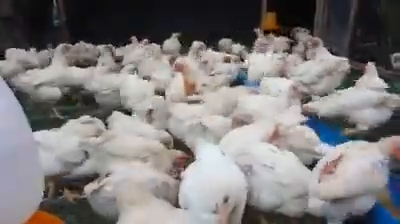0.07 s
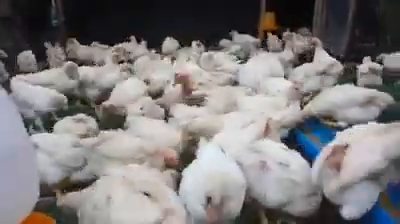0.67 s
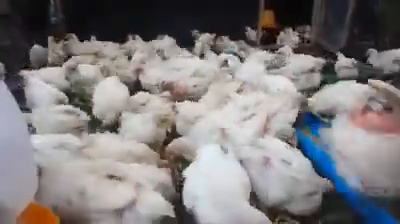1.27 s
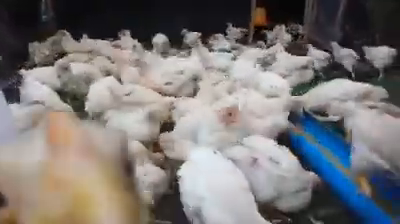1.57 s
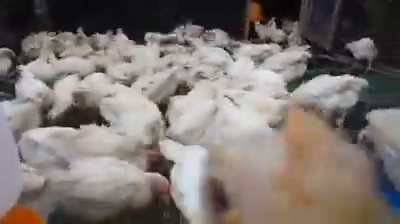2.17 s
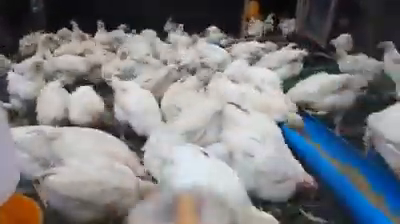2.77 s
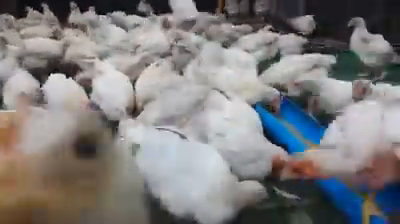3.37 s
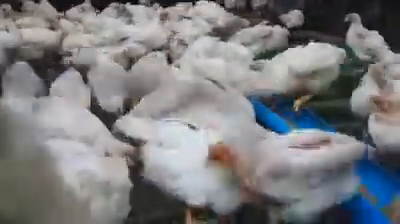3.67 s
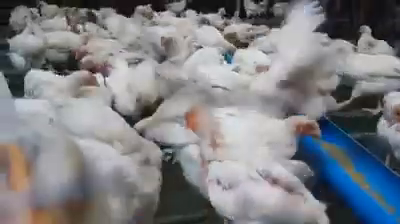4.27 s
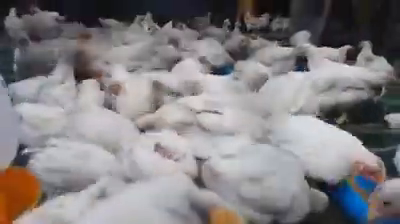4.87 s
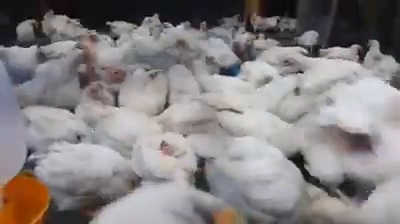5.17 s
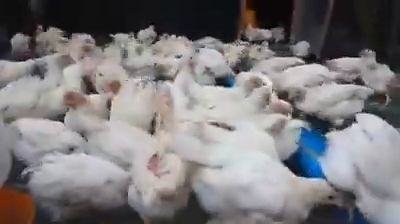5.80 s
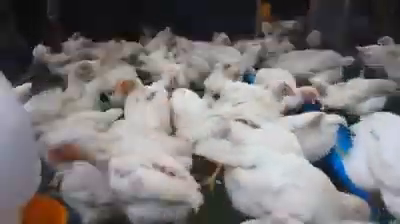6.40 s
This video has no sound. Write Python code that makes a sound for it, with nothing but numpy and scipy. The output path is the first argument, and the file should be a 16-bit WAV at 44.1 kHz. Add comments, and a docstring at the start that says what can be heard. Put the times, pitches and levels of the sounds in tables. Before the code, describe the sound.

A dense flock of young chickens peeps throughout in a slightly reverberant barn. Near birds give short, high, clear calls that fall in pitch, several a second and somewhat to the left, over a blurred chorus of farther birds. Underneath are a steady low fan rumble, a very faint cricket trill and soft shuffling in litter. Beaks tick lightly during the first second. Around 1.7 seconds a jostled bird gives a few brief harsh squeaks. At about 2.6 seconds one bird pecks the microphone, a loud, sharp, overloaded knock on the left. Everything then turns much quieter for about a second, climbing back by 4 seconds. From 3.5 to 5.5 seconds, feet and beaks knock lightly on floor and trough among the peeps. A few more ticks follow, and feathers brush past close by near 6.4 seconds as the peeping carries on.

```python
"""In a barn, a dense flock of young chickens peeps over a rumbling fan and a faintly trilling cricket.
Each peep is a nearly pure tone of the syrinx that sags and dives as the air runs out; roof and walls
add reverberation. Beaks and feet excite damped modes; litter and feathers make friction noise.
One bird pecks a small camera standing among them: the blow overloads its microphone,
and its gain control turns everything down for about a second."""
import sys
import numpy as np
from scipy import signal
from scipy.fft import rfft, irfft, next_fast_len
from scipy.io import wavfile
from scipy.ndimage import uniform_filter1d, map_coordinates

SR = 44100
rng = np.random.default_rng(int(sys.argv[2]) if len(sys.argv) > 2 else 0)


def digitize_waveform(pressure):
    """Quantize a signal to 16-bit integers and store it at the path in sys.argv[1].

    Rows of a 2-D input are taken as channels; values are limited to [-1, 1].
    """
    field = np.atleast_2d(pressure).T
    bounded = np.clip(field, -1, 1)
    quanta = np.round(bounded * 32767).astype(np.int16)
    wavfile.write(sys.argv[1], SR, quanta)


N = 292824

# Levels in the tables are relative: each source applies its own gains.
# Peeps of near birds: t/s, duration/s, f/Hz, sag/(Hz/s), final dive/Hz, level/dB, left minus right/dB
NEAR_PEEPS = [(0.129, 0.13, 5160.0, 10170, 250.0, -34.5, 8), (0.413, 0.15, 5260, 5880, 250, -36.5, 11),
              (0.428, 0.057, 4520, 5000.0, 250.0, -32.0, 4.0), (0.501, 0.19, 4384, 4570, 590, -27, 10),
              (0.52, 0.06, 3340, 6400.0, 250.0, -40.5, 1.0), (0.628, 0.081, 5120, 2950, 598, -33, 15),
              (0.678, 0.14, 4540, 2570, 1930, -34, 7.0), (1.123, 0.16, 5030, 3494, 630.0, -38.5, 15),
              (1.134, 0.05, 4620, 39600, 250.0, -35, -1.0), (1.31, 0.15, 5400, 14000.0, 250.0, -39.0, 5),
              (1.4, 0.06, 3080, 5670, 350.0, -38, 2.0), (1.484, 0.084, 3370.0, 12840, 250.0, -39.0, -1),
              (1.53, 0.15, 5470, 8260, 403, -35.5, 13), (1.666, 0.11, 4620, 3970, 250.0, -21.5, 8),
              (1.915, 0.086, 4540.0, 13640, 250.0, -35, -3), (2.027, 0.049, 4960, 37400, 250.0, -32.5, 8.0),
              (2.096, 0.11, 4580, 10400, 250.0, -34, 5.0), (2.277, 0.13, 5030, 12070, 250.0, -38, 9),
              (2.374, 0.19, 4580.0, 1543, 250.0, -34, 6), (2.387, 0.046, 3770, 20800, 200, -28, 5),
              (2.519, 0.035, 5360, 12000.0, 2690, -24.0, 2.0), (2.563, 0.073, 4100, 1200.0, 880, -36.5, -6),
              (2.727, 0.14, 5110, 7820, 1236, -30, 5), (2.738, 0.21, 4500, 4370, 250.0, -30, 4),
              (2.893, 0.14, 4560, 4100.0, 1148, -31, 5), (3.115, 0.077, 4490, 12460, 1037, -27.5, 6.5),
              (3.135, 0.1, 5620, 17500, 1520, -27, 3), (3.184, 0.12, 4180, 2120, 1570.0, -30.5, 2),
              (3.302, 0.11, 4320, 4850, 1056, -33.5, 5), (3.395, 0.0202, 2950, 16000, 350, -19.5, 10),
              (3.438, 0.15, 4550, 4850, 250.0, -31.5, 12), (3.574, 0.1, 4650, 7040, 280.0, -34.5, -1.0),
              (3.753, 0.113, 5500, 21800, 590, -31.5, 1.0), (3.895, 0.093, 4604, 3830, 250.0, -28, -2.0),
              (3.977, 0.12, 5655, 17340, 1383, -28, -1), (4.088, 0.05, 4865, 2000.0, 250.0, -34.5, 19),
              (4.229, 0.16, 4273, 2870, 249, -33.5, 4), (4.401, 0.029, 3180, 23400, 255, -27, 3.0),
              (4.406, 0.044, 4900, 12300, 250.0, -33, 5.0), (4.501, 0.06, 5330.0, 2400.0, 653, -34, 12),
              (4.53, 0.047, 3430, 10500, 250.0, -38, -7), (4.55, 0.12, 4510, 13140, 380.0, -32, -6),
              (4.701, 0.03, 3350, 20400, 870, -32, 2.0), (4.694, 0.045, 5670.0, 20500.0, 250.0, -35, 9.0),
              (4.74, 0.091, 4670.0, 3730, 800, -31, 8), (4.861, 0.1, 5140, 1300.0, 278, -38, 14),
              (4.936, 0.044, 5150, 35800.0, 250.0, -28.5, -2.0),
              (4.983, 0.09, 4630.0, 1700.0, 1477, -26.5, -5),
              (4.991, 0.07, 5260.0, 1200.0, 1560.0, -30.5, 3),
              (5.069, 0.049, 3460, 21100, 250.0, -34.5, -7), (5.231, 0.12, 5220.0, 19600, 836, -38, 3),
              (5.345, 0.18, 4850, 8500, 250, -28, 1.5), (5.351, 0.07, 4500, 3600, 151, -29.5, -4),
              (5.52, 0.088, 4680.0, 2000.0, 250.0, -35.5, 15), (5.661, 0.14, 4610, 4230, 200, -39.5, 4),
              (5.9, 0.16, 4754, 6300.0, 677, -24.5, -3.0), (6.091, 0.087, 4550.0, 1800.0, 250.0, -36, 7.0),
              (6.176, 0.064, 3250, 8850, 250.0, -36.5, -1.0), (6.267, 0.17, 4327, 4070, 690.0, -32.5, 1),
              (6.505, 0.054, 4170, 12400, 200, -37.5, -4), (6.615, 0.034, 3660, 23600, 250.0, -33, -5)]
# Calls that dip and swing up: t/s, duration/s, lowest f/Hz, rise/Hz, level/dB, left minus right/dB
NEAR_TWITTERS = [(2.407, .02, 2748, 800, -28, 0), (2.657, 0.041, 3310, 450, -40, 2),
                 (2.948, 0.03, 3420, 402, -32.5, 12.5), (4.954, 0.04, 2980, 1000, -26, -1),
                 (5.147, 0.058, 3370, 2220, -27.5, 5)]
# Harsh squeaks of a jostled bird: t/s, duration/s, f/Hz, level/dB, roughness (0-1)
JOSTLED_SQUEAKS = [(1.667, 0.012, 2830, -27.5, 0.35), (1.68, 0.029, 2426, -28.5, 0.67),
                   (1.685, 0.035, 3150, -28.5, 0.12), (1.783, 0.0098, 2434, -19.5, 0.36),
                   (1.796, 0.053, 2410, -29.5, 0.22), (1.788, 0.029, 3010, -25.5, 0.32),
                   (1.976, 0.049, 2360, -42, 0.26), (2.54, 0.014, 2074, -29, 0.55),
                   (2.557, 0.015, 2635, -22, 0.96), (5.932, .11, 2360, -52, 0.17)]
# Envelope of the farther birds together: t/s, level/dB
FLOCK_ENVELOPE = [(0, -41), (0.1, -44), (0.18, -36), (0.6, -37), (0.95, -41), (1.75, -31), (1.95, -37.5),
                  (2.25, -38), (2.45, -32), (2.85, -41), (3.3, -33.5), (3.7, -38.5), (4, -34),
                  (5.05, -34.5), (5.25, -41), (5.8, -36), (6.1, -40.5), (6.64, -41.5)]
# Spectrum of the farthest, blurred voices: f/Hz, level/dB
CHORUS_SPECTRUM = [(1200, -43.5), (1900, -11), (2400, -0.5), (3100, -6.5), (4400, 3), (5100, 3),
                   (5700, 0.5), (7500, -12), (10000, -27.5)]
# Beaks ticking on hard things: t/s, level/dB
BEAK_TICKS = [(0.1227, -21.5), (0.5027, -25), (0.695, -28), (0.9133, -25.5), (0.982, -33), (1.054, -23.5),
              (2.086, -30.5), (4.1774, -27.5), (4.962, -22), (5.6654, -32), (6.055, -32), (6.121, -34)]
# Feet and beaks knocking on floor and trough: t/s, level/dB, ring f/Hz
FLOOR_KNOCKS = [(2.216, -35.5, 653), (2.39, -37.5, 1015), (3.461, -30, 515), (3.564, -28, 1229),
                (3.757, -35.5, 1280), (3.775, -35, 990), (3.835, -35.5, 764), (4.055, -38, 596),
                (4.181, -36, 1800), (4.229, -33, 804), (4.435, -32.5, 615), (4.462, -33.5, 1304),
                (4.965, -35, 978), (5.336, -35, 1850), (6.425, -31, 299)]
# Noise spectrum of a hard contact: f/Hz, level/dB
CONTACT_SPECTRUM = [(1000, -11), (5000, 3.5), (8000, 2), (11000, -2.5), (15000, -17.5)]
# Envelope of feet shuffling in the litter: t/s, level/dB
SHUFFLE_ENVELOPE = [(0, -41.5), (.4, -44.5), (1.1, -46), (2.5, -44), (3.9, -44.5), (4.4, -39.5),
                    (4.75, -44.5), (5.1, -45), (5.5, -41.5), (6.42, -41.5), (6.64, -49)]
# Spectrum of the trodden litter: f/Hz, level/dB
LITTER_SPECTRUM = [(150, -37), (400, -2.5), (750, -1.5), (1100, -5.5), (1600, -5.5), (2500, -6), (5000, -7),
                   (15000, -31)]
# Spectrum of rubbing feathers: f/Hz, level/dB
RUB_SPECTRUM = [(800, -11), (3000, -10.5), (6000, 4.5), (8000, 4), (10500, 0), (13000, -7), (15500, -27)]
# Feathers brushing past: centre t/s, half duration/s, level/dB
FEATHER_BRUSHES = [(0.508, 0.041, -40.5), (2.314, 0.023, -48), (2.424, .025, -44.5), (3.166, 0.05, -34),
                   (3.533, 0.026, -32.5), (4.023, 0.043, -41), (5.46, 0.055, -41), (5.744, 0.15, -43),
                   (6.427, 0.063, -31)]
# Spectrum of feathers close by: f/Hz, level/dB
BRUSH_SPECTRUM = [(800, -6), (3000, -3), (6000, -5), (8000, 2), (11000, 1), (13500, -6.5), (15500, -19)]
# Envelope of the ventilation: t/s, level/dB
FAN_ENVELOPE = [(0, -43.5), (1, -45.5), (3.6, -45.5), (4.3, -44), (6.1, -44), (6.64, -41)]
# Spectrum of its rumble: f/Hz, level/dB
FAN_SPECTRUM = [(15, -16), (30, -13.5), (50, -5), (95, 0.5), (170, -0.5), (260, -6.5), (500, -12.5),
                (1000, -16.5), (3000, -62)]
# Reverberation time of the barn: f/Hz, T60/s
BARN_T60 = [(200, 0.44), (2500, 0.24), (4500, 0.21), (10000, 0.11)]
# Likeness of the noise at left and right: f/Hz, correlation (0-1)
STEREO_CORRELATION = [(200, 0.95), (500, 0.86), (1000, 0.29), (2500, 0.19), (10000, 0.19)]
# Response of the duller, left microphone: f/Hz, level/dB
LEFT_MIC_RESPONSE = [(5000, 0), (7000, 3.5), (9000, -7.5), (12500, -15.5)]


def peep(length, hz, sag, dive, scoop=0.0453, build_s=0.01522, dive_s=.025, soft_db=2.5, fade_db=2):
    """Air pressure drives the syrinx: the tone rises as it builds, sags, then dives as the air runs out."""
    t = np.arange(int(length * SR)) / SR
    building, spent = np.exp(-t / build_s), np.exp((t - length) / dive_s)
    pitch = hz * (1 - scoop * building) - sag * t - dive * spent
    return whistle(pitch) * amp(1.2 * wobble(21.6, len(t)) - soft_db * building - fade_db * spent)


def twitter(length, low_hz, rise, turn=0.47):
    """Frequency modulation along a parabola: the pitch swings down and up again."""
    progress = np.linspace(0, 1, int(length * SR))
    return whistle(low_hz + rise * ((progress - turn) / (1 - turn)) ** 2)


def whistle(hz, waver=0.00707, rasp=0.012, flutter_db=2.0, octave_db=-27, attack=0.0053, release=0.0038):
    """Self-sustained oscillation of the syrinx: a nearly pure tone with a slight waver and rasp."""
    n = len(hz)
    t = np.arange(n) / SR
    pitch = hz * (1 + waver * wobble(111.3, n) + rasp * wobble(898.6, n))
    phase = 2 * np.pi * np.cumsum(pitch) / SR
    tone = np.sin(phase) + amp(octave_db) * np.sin(2 * phase)
    gate = np.clip(t / attack, 0, 1) * np.clip(t[::-1] / release, 0, 1)
    return np.sqrt(2) * gate * amp(flutter_db * wobble(150, n)) * tone


def squeak(length, hz, roughness):
    """Irregular oscillation: a forced syrinx jumps about in frequency and amplitude."""
    n = int(length * SR)
    phase = 2 * np.pi * np.cumsum(hz * (1 + 0.17 * roughness * wobble(886, n))) / SR
    strength = amp(11.05 * roughness * wobble(200, n))
    return unit(np.sin(phase) * strength * signal.windows.tukey(n, .5))


def near_birds(even_db=-38.5, wet_slope=.5, squeak_wet_db=-4):
    """Direct and reverberant sound: a fainter bird is farther off, so more arrives by way of the walls."""
    direct, to_walls = np.zeros((2, 2, N))
    for call, rows in (peep, NEAR_PEEPS), (twitter, NEAR_TWITTERS):
        for start, *shape, db, left_db in rows:
            wet = amp(np.clip(wet_slope * (even_db - db), -10, 2))
            voice = amp(db) * call(*shape) / np.hypot(1, wet)
            add(direct, start, panned(left_db) * voice)
            add(to_walls, start, wet * panned(left_db / 2) * voice)
    for start, length, hz, db, roughness in JOSTLED_SQUEAKS:
        cry = amp(db) * panned(1.9) * squeak(length, hz, roughness)
        add(direct, start, cry)
        add(to_walls, start, amp(squeak_wet_db) * cry)
    return direct + barn(to_walls)


def far_birds(count=190, voices_db=-2, blur_db=-3.0, direct_db=-4, sag_share=.65):
    """Incoherent superposition: many distant peeps overlap, and the farthest blur into noise."""
    direct = np.zeros((2, N))
    for when, span, high, fall, loud, side in rng.random((count, 6)):
        length, hz = .04 + .12 * span, 3400 + 2000 * high
        drop_hz = hz * (.15 + .27 * fall)
        voice = peep(length, hz, sag=sag_share * drop_hz / length, dive=(1 - sag_share) * drop_hz)
        add(direct, when * N / SR, amp(7.8 * loud) * panned(12 * (side - .5)) * voice)
    voices = amp(voices_db) * unit(amp(direct_db) * direct + barn(direct))
    blur = amp(blur_db) * rush(CHORUS_SPECTRUM, patchy_db=4)
    return amp(curve(FLOCK_ENVELOPE)) * panned(2.2) * (voices + blur)


def camera_peck(start=2.5561, port_hz=1030, port_s=0.00236, case_hz=370, mount_hz=85):
    """Impact beside the left microphone: a crack, and resonances of the port's air, case and mount."""
    out, t = np.zeros((2, N)), np.arange(SR // 10) / SR
    port = np.sin(2 * np.pi * port_hz * t) * (t < port_s) * abs(np.sin(np.pi * t / port_s)) ** 0.35
    crack = contact_noise(len(t)) * np.exp(-t / .0024)
    case = np.sin(2 * np.pi * case_hz * t) * np.exp(-t / 0.002)
    mount = .09 * np.sin(2 * np.pi * mount_hz * t) * np.exp(-t / 0.0083)
    add(out, start, panned(26) * port + amp(-6) * crack + amp(-11.5) * panned(3.5) * (case + mount))
    return out


def pecking(tick_hz=4546, tick_db=7.0, knock_db=8, scratch_db=-37, scratches=45, wet_db=-8):
    """Impulsive excitation by beaks and feet: bright ticks, duller knocks and faint claw scratches."""
    out = np.zeros((2, N))
    for start, db in BEAK_TICKS:
        add(out, start, amp(db + tick_db) * contact(tick_hz, t60=0.023, crack=0.79, rise_s=0.001))
    for start, db, hz in FLOOR_KNOCKS:
        add(out, start, amp(db + knock_db) * contact(hz, t60=0.07, crack=0.38, rise_s=0.00021))
    for when, size, high in rng.random((scratches, 3)):
        scratch = contact(4500 + 2500 * high, t60=.016, crack=2.5, rise_s=0.00048)
        add(out, when * N / SR, amp(scratch_db + 8 * size) * scratch)
    return out + amp(wet_db) * barn(out)


def contact(hz, t60, crack, rise_s):
    """Damped free vibration after a blow: five modes near hz decay with a burst of noise; peak 1."""
    t = np.arange(SR // 8) / SR
    mode_hz = hz * np.exp(.22 * rng.standard_normal((5, 1)))
    ring = unit(np.sin(2 * np.pi * mode_hz * t).sum(0)) * panned(2.3)
    noise = crack * panned(-4) * contact_noise(len(t))
    blow = (ring + noise) * (1 - np.exp(-t / rise_s)) * np.exp(-np.log(1000) * t / t60)
    return blow / abs(blow).max()


def contact_noise(size):
    """A brief, hard contact has a broad spectrum: stereo noise of rms 1."""
    colour = amp(along(CONTACT_SPECTRUM, np.fft.rfftfreq(size, 1 / SR)))
    return unit(irfft(rfft(rng.standard_normal((2, size))) * colour, size))


def rustling(feather_db=-48, grain_db=3):
    """Friction noise: feet shuffle in the litter; feathers rub and brush past, mostly on the right."""
    t = np.arange(N) / SR
    shuffling = amp(curve(SHUFFLE_ENVELOPE) + 2.37 * wobble(35, N))
    feet = shuffling * panned(3.3) * rush(LITTER_SPECTRUM, patchy_db=3.0)
    rub = amp(feather_db + 2.4 * wobble(14, N)) * rush(RUB_SPECTRUM, patchy_db=3.0)
    passes = sum(amp(db) * np.exp(-((t - centre) / half) ** 2) for centre, half, db in FEATHER_BRUSHES)
    brush = passes * rush(BRUSH_SPECTRUM, patchy_db=3.5)
    catching = unit(amp(grain_db * wobble(600, N)))  # barbs catch and slip
    return feet + panned(-5) * catching * (rub + brush)


def fan():
    """Broadband ventilation noise, its energy mostly at low frequencies: a nearly steady rumble."""
    return amp(curve(FAN_ENVELOPE)) * panned(0.78) * rush(FAN_SPECTRUM, patchy_db=.5)


def cricket(chirps_per_s=11.4, hz=6530, sweep=0.0735, scatter=0.015, stroke_s=0.01, spacing_s=.015):
    """Stridulation: each chirp is three wing strokes, each falling in pitch and no two alike."""
    out, progress = np.zeros((2, N)), np.linspace(0, 1, int(stroke_s * SR))
    for chirp in range(80):
        for stroke, stroke_db in enumerate([-4, 0, -6]):
            late, size, sharp = rng.standard_normal(3)
            pitch = hz * (1 + sweep * (.5 - progress) + scatter * sharp)
            scrape = np.sin(np.pi * progress) * np.sin(2 * np.pi * np.cumsum(pitch) / SR)
            start = 0.069 + chirp / chirps_per_s + stroke * spacing_s + 0.0022 * late
            add(out, start, amp(stroke_db + 2 * size) * scrape)
    return amp(-49) * unit(out + amp(-3) * barn(out))


def barn(x, width=0.92):
    """Diffuse reverberation: reflections from roof and walls decay exponentially, the treble first."""
    hz, t, noise = signal.stft(rng.standard_normal((2, SR // 2)), SR, nperseg=256)
    decay = amp(-60 * t / along(BARN_T60, hz)[:, None])
    mid, side = signal.istft(noise * decay, SR, nperseg=256)[1]
    predelay = SR // 300
    tail = np.pad([mid + width * side, mid - width * side], ((0, 0), (predelay, 0)))
    return signal.fftconvolve(x, tail / np.linalg.norm(tail[0]), axes=1)[:, :N]


def rush(spectrum, patchy_db):
    """Partly coherent stereo noise of rms 1, its gain varying in patches of time and frequency."""
    def mid_side_gains(hz):
        angle = np.arccos(np.clip(along(STEREO_CORRELATION, hz), -1, 1)) / 2
        return amp(along(spectrum, hz)) * [np.cos(angle), np.sin(angle)]

    noise = signal.stft(rng.standard_normal((2, N)), nperseg=512)[2]
    patches = uniform_filter1d(rng.standard_normal(noise.shape[1:]), size=5, axis=0)
    patches = uniform_filter1d(patches, size=7, axis=1)
    pair = signal.istft(noise * amp(patchy_db * unit(patches)), nperseg=512)[1][:, :N]
    mid, side = filtered(pair, mid_side_gains)
    return unit(np.array([mid + side, mid - side]))


def gain_control(x, threshold=.4, depth_db=21, hold_s=0.65, recovery_s=0.45, lag_s=0.17):
    """Automatic gain control: a low-band overload turns the gain down; it holds, then climbs back."""
    low_band = abs(filtered(x, lambda hz: 1 / (1 + (hz / 1500) ** 8))).max(0)
    t = np.arange(N) / SR
    since_overload = t - np.maximum.accumulate(np.where(low_band > threshold, t, -np.inf))
    cut_db = depth_db * np.clip(1 - (since_overload - hold_s) / recovery_s, 0, 1)
    pole = np.exp(-1 / (lag_s * SR))
    return x * amp(-signal.lfilter([1 - pole], [1, -pole], cut_db))


def amp(db):
    """Amplitude ratio of a level in dB."""
    return 10 ** (np.asarray(db) / 20)


def unit(x):
    """Normalisation to rms 1."""
    return x / np.sqrt(np.mean(x ** 2) + 1e-20)


def along(points, hz):
    """Interpolation of (f/Hz, value) points on a logarithmic frequency axis."""
    freqs, values = np.transpose(points)
    return np.interp(np.log(hz + 1), np.log(freqs), values)


def curve(rows):
    """Linear interpolation of (t/s, value) rows to one value per sample."""
    return np.interp(np.arange(N) / SR, *np.transpose(rows))


def wobble(rate, size):
    """Smooth random modulation: a spline through rate knots a second."""
    knots = rng.standard_normal(int(size * rate / SR) + 4)
    return map_coordinates(knots, [np.arange(size) * rate / SR])


def filtered(x, response):
    """Linear filtering: the spectrum of x times a frequency response."""
    size = next_fast_len(N + SR // 2)
    return irfft(rfft(x, size) * response(np.fft.rfftfreq(size, 1 / SR)), size)[..., :N]


def panned(left_db):
    """Channel gains for a left-minus-right level difference at constant power."""
    return unit(amp([[left_db / 2], [-left_db / 2]]))


def add(track, start, sound):
    """Superposition of a sound on the track from start, in seconds."""
    rest = track[:, max(round(start * SR), 0):]
    rest[:, :sound.shape[-1]] += sound[..., :rest.shape[-1]]


def scene():
    """The sound pressures of all sources add linearly."""
    return near_birds() + far_birds() + cricket() + pecking() + camera_peck() + rustling() + fan()


def record(dry, top_hz=15400):
    """Transduction: microphone colour, gain control, clipping at full scale and a band limit."""
    heard = filtered(dry, lambda hz: amp([along(LEFT_MIC_RESPONSE, hz), np.zeros_like(hz)]))
    clipped = np.clip(gain_control(heard), -1, 1)
    return filtered(clipped, lambda hz: 1 / np.sqrt(1 + (hz / top_hz) ** 120))


dry = scene()
out = record(dry)
digitize_waveform(out)
```